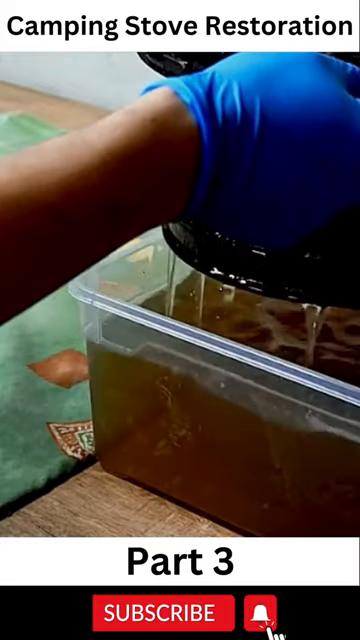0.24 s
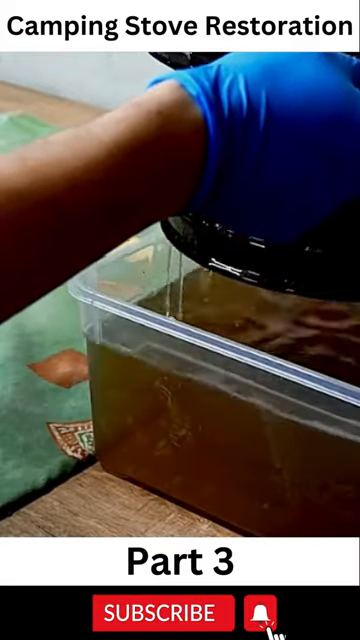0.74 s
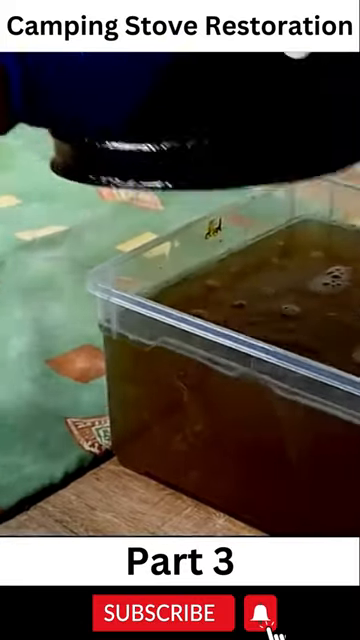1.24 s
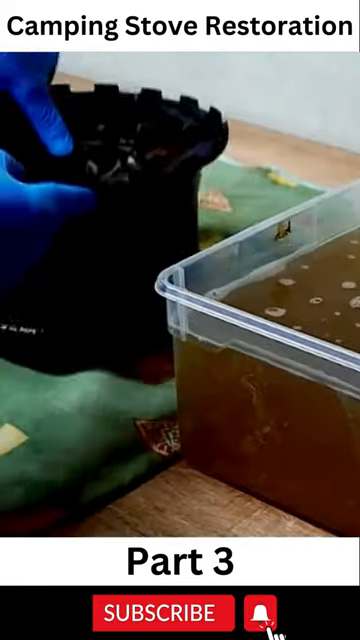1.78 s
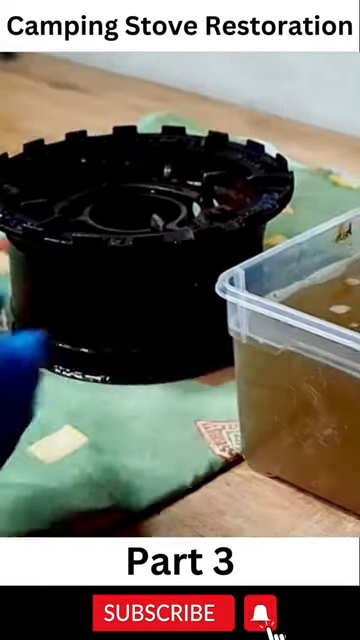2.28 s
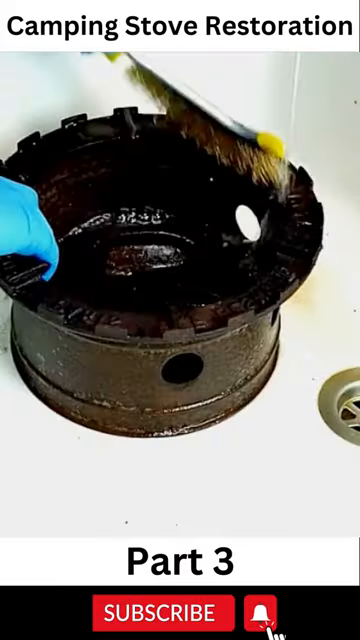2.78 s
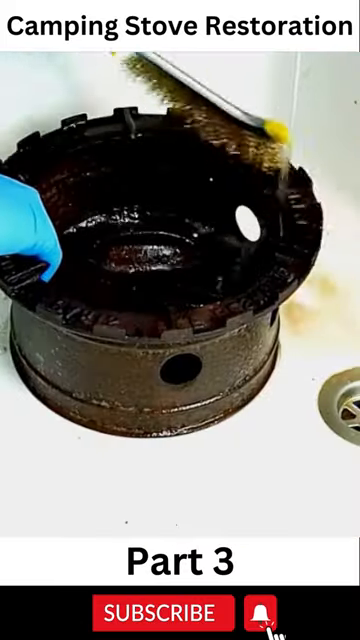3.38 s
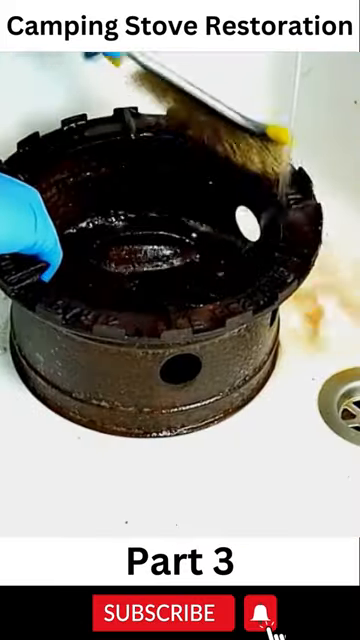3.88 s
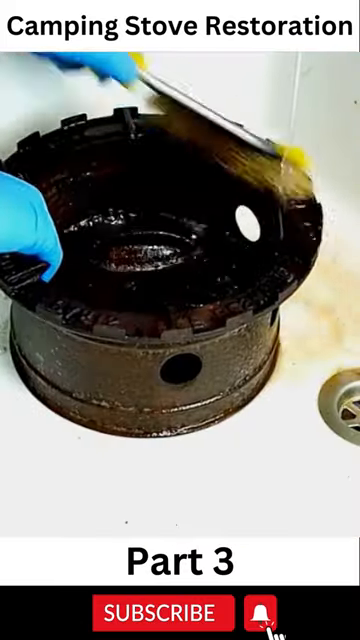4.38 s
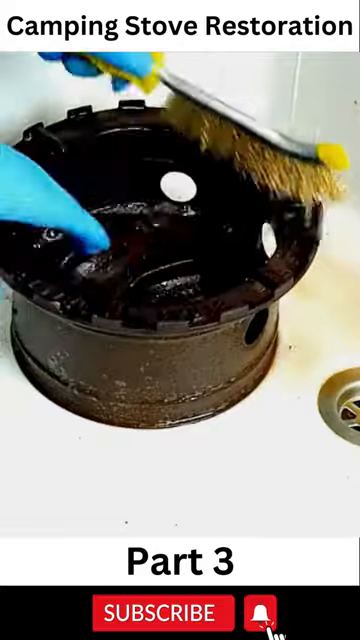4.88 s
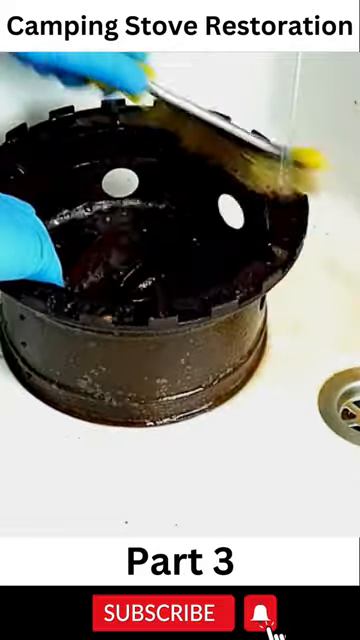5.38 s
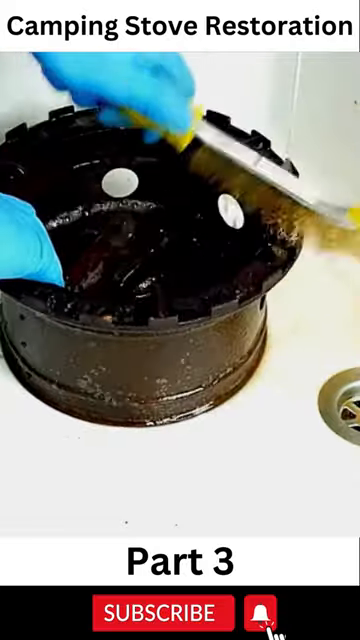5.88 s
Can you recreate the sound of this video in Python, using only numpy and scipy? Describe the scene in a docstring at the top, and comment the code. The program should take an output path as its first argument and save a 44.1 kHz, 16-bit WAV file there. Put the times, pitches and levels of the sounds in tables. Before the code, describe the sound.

From 0 to 0.9 s, water runs off a metal shell into a bath, close by: quick irregular plinks, ringing bubbles rising in pitch, and a fine spray, thinning out. The dripping cuts off; around 1.0 s a dull gloved double knock sounds on damped metal, with soft cloth rustle. Then the workshop is nearly silent, with faint knocks near 1.7 and 2.0 s over quiet room tone and low hum. At 2.69 s comes an abrupt cut to a sink: a small thud, a thin tap stream and stronger wavering hum. A wire brush rasps loudly over the toothed rim, seven bright, gritty strokes until 4.5 s, roughly every 0.27 s, ringing the metal. From 4.6 to 5.1 s brushing pauses for sharp ticks, rattles and low grinding as the shell is dragged round. Four more strokes follow from 5.14 s, with a heavier sink boom, until the end at about 6 s.

```python
"""A quiet workshop, then a sink, both heard close up through two microphone ports.
A cast metal stove shell lifted out of a bath drips as ringing bubbles over a fine spray; it is then handled
and set down on a cloth, with damped knocks and rustling grains. After a cut it stands in the sink under a
thin tap stream while a wire brush, dense clicks that ring shell and sink, scrubs its toothed rim.
The brush pauses while the shell is dragged round. Room tone and a wavering low hum lie behind."""
import sys
import numpy as np
from scipy import signal
from scipy.fft import rfft, irfft
from scipy.io import wavfile

SR = 44100
rng = np.random.default_rng(int(sys.argv[2]) if len(sys.argv) > 2 else 0)


def unload_wav(signal):
    """Save mono or channel-first audio to the path in sys.argv[1] as 16-bit WAV at rate SR, clipped to [-1, 1]."""
    wavfile.write(
        sys.argv[1],
        SR,
        np.round(np.clip(np.atleast_2d(signal).T, -1, 1) * 32767).astype(np.int16),
    )


def boost(x):
    """Linear amplitude factor 10**(x/20) for a level x in decibels (scalar or array-like)."""
    u = np.asarray(x, float) / 20
    return 10 ** u


N = 270774
TIME = np.arange(N) / SR
BATH_ENDS_S, SINK_STARTS_S, TURN_S = 0.908, 2.6865, 4.8


# Tone of the bristles on metal: freq_hz, level_db (relative)
BRISTLES = [(880, -71), (1500, 5.5), (1770, -6), (2170, -7.5), (2780, 2.5), (3060, -1), (5560, -0.5),
            (7670, -5), (8370, -3), (12900, -5.5), (15500, -8.5)]


def brushing():
    """Wires catch and let go in dense uneven clicks, in flurries as they cross the teeth of the rim."""
    wires = grains(9000.0, spread_db=3.0) * boost(1.2 * drift(60.0))
    scratch = patchy(colour(wires, BRISTLES), patchy_db=2.3, rate=18.0)
    ringing = shell(wires)
    bright_ring = rms_one(cut(ringing, 2700, "high"))
    middle = rms_one(cut(scratch, 7530, "low")) + boost(-18.0) * bright_ring
    hiss = rms_one(cut(scratch, 8300, "high"))
    ring = rms_one(cut(ringing, 2050, "low"))
    shaken = rms_one(boom(grains(2500.0, spread_db=2.5)))
    brushed = np.sum(strokes() * [middle, hiss, ring, shaken], axis=0)
    stream_ring = boost(-58) * ring  # the stream from the tap keeps the shell faintly ringing
    return brushed + dragging(scratch, ring, shaken) + stream_ring


# Brush strokes: lands_s, touch_db, rise_s, full_db, hold_s, shell_ring_db, sink_boom_db
# (touch and full are bristle levels; ring and boom are added to the stage colours below)
STROKES = [(2.73, -37.5, 0.083, -31, 0.055, -0.5, 3), (3.024, -37.5, 0.057, -25.5, 0.022, 2, 1.5),
           (3.293, -38.5, 0.052, -25.5, 0.033, 1, 1), (3.565, -34, 0.054, -24.5, 0.022, -2.5, -0.5),
           (3.82, -40.5, 0.057, -25.5, 0.026, -4, 1), (4.11, -30, 0.017, -26.5, 0.058, -3.5, 3.5),
           (4.373, -31, 0.055, -25, 0.01, -1.5, -0.5), (5.143, -28, 0.021, -25.5, 0.056, -2, 5),
           (5.426, -35, 0.034, -26, .012, 1, 2), (5.674, -30.5, 0.046, -26, 0.011, -3, 5.5),
           (5.935, -32.5, 0.042, -26.5, 0.034, -2.5, 6.5)]
# Colour of a stroke, one row each for approach, landing, full pressure, lift, trailing and end:
# hiss_db, shell_ring_db, sink_boom_db (all re bristles)
STAGES = [(9, -13, -23), (-4.5, -3, -13), (-3, -1.5, -21.5), (2, -1.5, -17), (-6.5, -3.5, -11),
          (1, -19, -5)]


def strokes():
    """Each stroke lands, swells to full pressure, holds, lifts and trails; the loudest at any moment is heard."""
    approach_s, approach_db = 0.015, -18  # the first wires touch this long before, this much weaker
    sag_db_per_s, lift_db_per_s = 47, 195.5  # loss while the brush holds, and as it lifts
    trail_db, trail_db_per_s, trail_s = -49, 87, 0.2  # below this level only trailing wires drag
    boom_lag_s = 0.018  # the heavy sink answers the brush late
    levels_db = np.full((4, N), -120.0)
    for lands_s, touch_db, rise_s, full_db, hold_s, ring_db, boom_db in STROKES:
        lift_db = full_db - sag_db_per_s * hold_s
        lift_s = (lift_db - trail_db) / lift_db_per_s
        steps_s = np.maximum([approach_s, rise_s, hold_s, lift_s, trail_s], 0.001)
        times_s = lands_s - approach_s + np.cumsum([0, *steps_s])
        end_db = trail_db - trail_db_per_s * trail_s
        bristle_db = np.array([touch_db + approach_db, touch_db, full_db, lift_db, trail_db, end_db])
        colours_db = np.add(STAGES, [0, ring_db, boom_db])
        layers_db = bristle_db[:, None] + np.c_[np.zeros(len(STAGES)), colours_db]
        curves_db = [np.interp(TIME, times_s, c, left=-120, right=-120) for c in layers_db.T]
        levels_db = np.maximum(levels_db, curves_db)
    levels_db[-1] = np.interp(TIME - boom_lag_s, TIME, levels_db[-1])
    return boost(levels_db)


# The shell dragged round on the sink: time_s, grind_db, gritty_hiss_db, grind_centre_hz
DRAG = [(4.6, -61, -66, 1122), (4.64, -61, -40, 1130), (4.762, -42, -71, 754), (4.8, -54, -42, 775),
        (4.862, -44.5, -47, 520), (4.885, -55.5, -66, 580), (5.0, -65.5, -49, 930),
        (5.062, -43.5, -42.5, 1050), (5.088, -43.5, -32.5, 1190), (5.124, -76, -55, 1160)]


def dragging(scratch, ring, shaken):
    """The shell grinds round on the sink: low rough contact shakes both, with gritty hiss on top."""
    grind_db, grit_db, grind_hz = in_time(DRAG)
    turning = (TIME > DRAG[0][0]) & (TIME < DRAG[-1][0])
    rough = grind(grind_hz) + boost(-1.5) * shaken + boost(-8.0) * ring
    return turning * (boost(grind_db) * rough + boost(grit_db) * rms_one(scratch))


def grind(centre_hz):
    """Rough metal on enamel: coarse clicks in a low region that moves with the contact."""
    clicks = grains(2000.0, spread_db=-6.0)
    out = np.zeros(N)
    for hz in np.geomspace(400, 1700, 8):
        band = rms_one(resonance(clicks, hz, hz / 31.0))
        out += boost(-24.0 * np.abs(np.log2(hz / centre_hz))) * band
    return out


# Ticks of wire and metal on the rim: start_s, peak_db (rattle alone), pitch_hz, t60_s (driving burst),
# width_share (of pitch)
TICKS = [(2.689, -36, 3150, 0.5, 0.96), (3.311, -36, 1320, 0.05, 0.67), (4.089, -29.5, 1300, 0.055, 0.97),
         (4.334, -23, 6240, 0.042, 0.87), (4.626, -12.5, 3030, 0.032, 0.71), (4.657, -26.5, 4350, 0.032, 1),
         (4.709, -13, 4020, 0.014, 0.49), (4.825, -28, 5500, 0.086, 0.15), (5.021, -24, 5760, 0.11, 1.4),
         (5.392, -26, 1410, 0.1, 0.77), (5.88, -29, 5500, .03, 0.25)]
# Short scrapes on the rim: start_s, peak_db (rattle alone), pitch_hz, t60_s (driving burst)
SCRAPES = [(2.686, -30.5, 1330, .12), (2.709, -29, 1650, 0.12), (2.947, -35, 1520, 0.032),
           (2.953, -33, 1240, 0.036), (2.956, -36.5, 1970, .07), (4.632, -19.5, 2840, 0.02),
           (4.754, -28.5, 838, 0.032), (5.043, -25, 5500, 0.019), (5.063, -30, 1470, 0.047),
           (5.076, -17.5, 6000, 0.056), (5.273, -26.5, 5550, 0.032), (5.351, -30, 2670, 0.046)]


def ticks():
    """Each tick is a crack and a short rattle about its own pitch; it also strikes the shell."""
    tick_rise_s, scrape_rise_s, scrape_width = 0.0012, 0.0092, 0.16
    # each landing ticks too: its peak follows the stroke's shell ring
    landings = [(lands_s, -30.5 + ring_db, 1300, 0.096, 0.52) for lands_s, *_, ring_db, _ in STROKES]
    rows = [(*row, tick_rise_s) for row in TICKS + landings]
    rows += [(*row, scrape_width, scrape_rise_s) for row in SCRAPES]
    out, blows, t = np.zeros(N), np.zeros(N), TIME[:SR // 6]
    for start_s, peak_db, hz, t60, width_share, rise_s in rows:
        noise = rng.standard_normal((2, len(t)))
        swell = np.minimum(t / max(rise_s, 0.0002), 1) * boost(-60 * t / max(t60, 0.005))
        width_hz = np.clip(width_share, 0.03, 1.5) * hz
        rattle = resonance(resonance(noise[0] * swell, hz, width_hz), hz, width_hz)
        crack = cut(noise[1] * swell, 2700, "high")
        crack_gain = boost(-4.5 - 2100 * rise_s)  # slow scrapes crack less
        tick = rattle / np.abs(rattle).max() + crack_gain * crack / np.abs(crack).max()
        add(out, start_s, boost(peak_db) * tick)
        add(blows, start_s, boost([peak_db - 1500 * rise_s]))  # and strike the shell less
    return out + boost(23.0) * shell(blows)


def thud():
    """The shell rocks down on the sink: one short push rings the sink's modes."""
    push = np.zeros(N)
    add(push, 2.6875, np.hanning(30))
    struck = boom(push, rocking=True)
    return boost(-21.5) * struck / np.abs(struck).max()  # peak dB


# Resonances of the shell on the sink: freq_hz, width_hz, before_turn_db, after_turn_db
SHELL = [(503, 20, -11, -7), (1000, 35, -17, -12), (1168, 13, -0.5, -6), (1192, 13, 0, -7),
         (1345, 17, -5, 1), (1725, 60, -13, -14), (2000, 50, -15, -15), (2698, 40, -6, -9),
         (2866, 30, -8, -9), (3385, 50, -9, -12), (4442, 40, -9, -12), (4700, 60, -10, -9),
         (5447, 55, -9, -9), (5907, 30, -9, -11), (6698, 30, -4, -7), (6858, 25, -5, -4),
         (7295, 30, -9, -9)]


def shell(x):
    """The turn puts brush and hand on other spots, so modes change strength; they also waver along a stroke."""
    out = np.zeros(N)
    for k, (hz, width_hz, before_db, after_db) in enumerate(SHELL):
        wavering = x * boost(2.73 * drift(23.0)) + 1e-18
        level = boost(np.where(TIME < TURN_S, before_db, after_db))
        out += (-1) ** k * level * resonance(wavering, hz, width_hz)
    return out


# Resonances of the sink under the shell: freq_hz, width_hz, shaken_db, struck_db
BOOM = [(205, 21, -2, 6.5), (283.2, 30, 0, -32), (374, 134, -6, -10), (451, 26, -11.5, -3),
        (487, 12.7, -8, 10), (611, 30, -4.5, 0), (780, 330, -14.5, -9)]


def boom(x, rocking=False):
    """The sink's modes, shaken by the brush or struck by the rocking shell."""
    out = np.zeros(N)
    for k, (hz, width_hz, shaken_db, struck_db) in enumerate(BOOM):
        level_db = struck_db if rocking else shaken_db
        out += (-1) ** k * boost(level_db) * resonance(x + 1e-18, hz, width_hz)
    return out


# Run-off into the bath: time_s, trickle_db, spray_db
RUNOFF = [(0.0, -41, -48.5), (0.074, -47.5, -52), (0.238, -54.5, -52.5), (0.5, -45, -52),
          (0.624, -48.5, -51), (0.778, -57, -55.5), (0.9, -58, -58)]
# Loudest drops: start_s, level_db (before the weighting by pitch), pitch_hz
DROPS = [(0.0156, -20.5, 3250), (0.1135, -22, 4720), (0.118, -22.5, 1186), (0.211, -35.5, 920),
         (0.231, -28, 1660), (0.233, -30.5, 1070), (0.264, -30, 1070), (0.276, -26, 1283),
         (0.2904, -26.5, 3290), (0.353, -32, 2300), (0.37, -30.5, 1144), (0.384, -31, 1190),
         (0.407, -26, 1262), (0.4364, -18, 3300), (0.455, -28.5, 1580), (0.4644, -26.5, 2370),
         (0.4786, -17.5, 4300), (0.509, -32, 1100), (0.552, -28, 1337), (0.594, -29.5, 1150),
         (0.6013, -23.5, 2206), (0.664, -29, 1234), (0.7128, -25, 3820), (0.7304, -23, 4080),
         (0.7512, -20, 3980), (0.838, -31, 1270)]
# Tone of the fine spray: freq_hz, level_db (relative)
SPRAY = [(350, -51), (600, -29), (979, -32), (1080, 9), (1230, 11), (2640, -5.5), (3660, -10.5),
         (6310, -14), (9370, -14), (15500, -21.5)]


def dripping():
    """Drops trap bubbles that ring and rise in pitch; many small ones come at random over a fine spray."""
    trickle_db, spray_db = in_time(RUNOFF)
    born = grains(450.0 * boost(3.0 * drift(15.0)), spread_db=4.0)
    dealt = rng.integers(0, 24, N)  # each small bubble gets one of 24 pitches
    small = np.zeros(N)
    for k, hz in enumerate(np.geomspace(950, 6000, 24)):
        small += resonance(born * (dealt == k) + 1e-18, hz, hz / 21.0) * (900 / hz) ** 0.89
    spray = rms_one(patchy(colour(grains(6000.0, spread_db=1.0), SPRAY), patchy_db=3.5, rate=18.0))
    low_spray = rms_one(cut(spray, 3000, "low"))
    out = boost(trickle_db) * (boost(-1.5) * rms_one(small) + boost(-7.0) * low_spray)
    out += boost(spray_db) * rms_one(cut(spray, 2450, "high"))

    t = TIME[:SR // 8]
    for start_s, level_db, hz in DROPS:
        t60 = 0.034 / (hz / 1e3) ** 0.44  # ring time, shorter for higher bubbles
        swell = (1 - np.exp(-t / 0.0026)) * boost(level_db - 60 * t / t60)
        bubble = np.sin(2 * np.pi * hz * t * (0.97 + 1.7 * t))
        noise = rng.standard_normal(len(t))
        splash = rms_one(resonance(resonance(noise, hz, hz / 5), hz, hz / 5))
        # high drops are more splash than bubble
        add(out, start_s, swell * (bubble * 1500 / hz + splash * hz / 9000))
    return out


# Shell handled and set down: start_s, peak_db (shell alone), strongest_hz, scuff_t60_s
KNOCKS = [(0.972, -36.5, 2600, 0.033), (1.024, -23.5, 1910, 0.042), (1.032, -24, 2610, 0.014),
          (1.393, -55, 2570, 0.046), (1.724, -46, 1870, 0.1), (1.734, -57, 1890, 0.044),
          (2.019, -52, 1200, 0.1), (2.043, -46.5, 1990, 0.032)]
# Resonances of the shell, damped by gloves: freq_hz, width_hz (limited in held_mode), level_db
HELD_SHELL = [(443, 230, -3), (1070, 98, 7), (1324, 100, 0), (1650, 200, 5), (1873, 190, 8.5),
              (2140, 300, -19), (2624, 240, 6.5), (2860, 220, 2.5), (3360, 230, -4), (3950, 320, -4.5),
              (4300, 170, -5), (5000, 110, -37)]


def knocks():
    """Padded contacts scuff the held shell and ring its damped modes, with a thin bright edge."""
    t, out = TIME[:SR // 3], np.zeros(N)
    for start_s, peak_db, centre_hz, t60 in KNOCKS:
        noise = rng.standard_normal(len(t))
        scuff = cut(noise * boost(-60 * t / max(t60, 0.005)), 6000, "low")  # padded contact is dull
        knock = np.zeros(len(t))
        for hz, width_hz, level_db in HELD_SHELL:
            away_db = 3.8 * abs(np.log2(hz / centre_hz))
            knock += boost(level_db - away_db) * held_mode(scuff, hz, width_hz)
        crack = 0.5 * cut(noise, 4500, "high") * boost(-25 - 60 * t / 0.025)
        add(out, start_s, boost(peak_db) * (knock / np.abs(knock).max() + crack))
    return out


# Shell sliding in the gloves and over the cloth: time_s, cloth_db, shell_ring_db (re cloth)
RUSTLE = [(0.918, -71, 2), (0.965, -54.5, -2), (0.98, -51, 1), (1.05, -50.5, 6), (1.119, -56.5, 11.5),
          (1.145, -57.5, -6), (1.38, -72.5, 2), (2.01, -72.5, -23), (2.08, -63, -17), (2.162, -68.5, -3),
          (2.68, -62.5, -10)]
# Tone of the cloth: freq_hz, level_db (relative)
CLOTH = [(180, -3), (300, -4.5), (590, 0), (1030, -0.5), (1640, -2.5), (1970, -3), (3450, -8.5),
         (15500, -35.5)]


def rustling():
    """Glove friction rings the held shell while the cloth rustles in fine grains."""
    cloth_db, ring_db = in_time(RUSTLE)
    friction = cut(grains(4000.0, spread_db=2.5), 4500, "low")
    rub = sum(boost(level_db) * held_mode(friction, hz, width_hz) for hz, width_hz, level_db in HELD_SHELL)
    cloth = rms_one(colour(grains(8000.0, spread_db=2.5), CLOTH)) * boost(1.5 * drift(12.0))
    return (TIME > BATH_ENDS_S) * boost(cloth_db) * (cloth + boost(ring_db) * rms_one(rub))


def held_mode(x, hz, width_hz):
    """A damped mode with steep skirts: two equal resonances in a row."""
    width_hz = np.clip(width_hz, 120, 300)
    return resonance(resonance(x, hz, width_hz), hz, width_hz)


# Tone of the thin tap stream: freq_hz, level_db (relative)
TAP = [(12, -36), (20, 6), (119, 15.5), (439, -8.5), (505, 5), (857, -8), (1160, 9), (1270, -4.5),
       (2150, 1.5), (2610, 3), (5530, -5), (11700, -4), (15500, -13.5)]


def tap():
    """A thin stream of water: dense random clicks of very uneven size, coloured."""
    return boost(-46.5) * rms_one(colour(grains(7000.0, spread_db=8.0), TAP))


# Tone of the quiet workshop: freq_hz, level_db (relative)
ROOM_TONE = [(12, -37), (20, -10.5), (92, -2.5), (191, -13), (298, -11), (427, -19), (667, -17), (746, -22),
             (881, -22), (2330, -27.5), (6540, -30), (12800, -33), (15500, -36)]


def room_tone():
    """Steady coloured noise of the quiet workshop."""
    return boost(-62) * rms_one(colour(rng.standard_normal(N), ROOM_TONE))


def hum(level_db):
    """A wavering low hum: noise through two narrow resonances in a row."""
    hz, width_hz = 115.6, 6.1
    noise = rng.standard_normal(N)
    return boost(level_db) * rms_one(resonance(resonance(noise, hz, width_hz), hz, width_hz))


def ports(x, width, wet_db, t60, near_t60):
    """A dying tail for both ports; near echoes reach them unequally."""
    mid = x + boost(wet_db) * diffuse(x, t60)
    side = colour(diffuse(mid, near_t60), width)
    return np.array([mid + side, mid - side])


def diffuse(x, t60):
    """Scattered echoes whose paths shift as hands and shell move: two patterns blend slowly."""
    t, turn = TIME[:SR // 2], 2.43 * drift(2.36)
    patterns = rng.standard_normal((2, len(t))) * boost(-60 * t / t60)
    one, other = (signal.fftconvolve(x, rms_one(echoes) / np.sqrt(len(t)))[:N] for echoes in patterns)
    return np.cos(turn) * one + np.sin(turn) * other


def patchy(x, patchy_db, rate):
    """Half-octave regions swell and fade on their own."""
    edges = 1000 * 2 ** np.arange(0, 4.6, 0.5)
    bins = np.arange(N // 2 + 1) * SR / N + 1
    place = np.clip(2 * np.log2(bins / edges[0]), 0, len(edges) - 1)
    spectrum, out = rfft(x), np.zeros(N)
    for k in range(len(edges)):
        region = irfft(spectrum * np.clip(1 - np.abs(place - k), 0, 1), N)
        out += region * boost(patchy_db * drift(rate))
    return out


def grains(per_s, spread_db):
    """Random clicks of uneven size and sign."""
    sizes = boost(spread_db * np.minimum(rng.exponential(1, N), 3.5)) * rng.choice([-1, 1], N)
    return sizes * (rng.random(N) < per_s / SR)


def drift(rate):
    """Slow random wander of rms 1; rate in Hz sets how fast."""
    r = np.exp(-2 * np.pi * rate / SR)
    noise = rng.standard_normal(N + SR)
    return rms_one(signal.lfilter([1], [1, -2 * r, r * r], noise)[SR:])


def resonance(x, hz, width_hz):
    """One ringing mode with gain 1 on top."""
    r = np.exp(-np.pi * width_hz / SR)
    poles = [1, -2 * r * np.cos(2 * np.pi * hz / SR), r * r]
    return signal.lfilter([(1 - r * r) / 2, 0, (r * r - 1) / 2], poles, x)


def colour(x, spectrum):
    """Shape by a (freq_hz, level_db) table, straight on a log axis."""
    hz, level_db = np.transpose(spectrum)
    bins = np.arange(N // 2 + 1) * SR / N + 1
    return irfft(rfft(x) * boost(np.interp(np.log(bins), np.log(hz), level_db)), N)


def cut(x, hz, kind):
    """Steep low- or high-pass."""
    sos = signal.butter(4, np.clip(hz, 20, 0.45 * SR), kind, fs=SR, output="sos")
    return signal.sosfilt(sos, x)


def rms_one(x):
    """Scale to rms 1."""
    return x / np.sqrt(np.mean(x ** 2) + 1e-20)


def in_time(rows):
    """Columns of a curve, sample by sample."""
    time_s, *columns = np.transpose(rows)
    return [np.interp(TIME, time_s, c) for c in columns]


def add(out, start_s, sound):
    """Mix a sound in at start_s."""
    i = round(start_s * SR)
    out[i:i + len(sound)] += sound[:N - i]


# Difference between the two ports: freq_hz, level_db (re their sum)
WORKSHOP_WIDTH = [(60, -35), (110, -22), (200, -9), (380, -7.5), (700, -6), (1290, -10.5), (2380, -7),
                  (4400, -5), (6500, -4), (8120, -15), (11500, -13), (15000, -15)]
SINK_WIDTH = [(60, -45), (110, -35), (200, -44), (380, -26), (700, -12.5), (1290, -18.5), (2380, -10),
              (4400, -7.5), (6500, -5.5), (8120, -17.5), (11500, -19), (15000, -10)]


def scene():
    """Bath and bench in the workshop, then the cut to the sink."""
    bath = ports(dripping(), WORKSHOP_WIDTH, wet_db=-1.0, t60=0.17, near_t60=0.064)
    bath = bath * (TIME < BATH_ENDS_S)
    at_bench = knocks() + rustling() + room_tone() + hum(-75)
    bench = ports(at_bench, WORKSHOP_WIDTH, wet_db=-6.5, t60=0.55, near_t60=0.28)
    at_sink = brushing() + ticks() + thud() + tap() + hum(-61.5)
    sink = ports(at_sink, SINK_WIDTH, wet_db=-6.0, t60=0.23, near_t60=0.27)
    return np.where(TIME < SINK_STARTS_S, bath + bench, sink)


def top_cut(x):
    """Nothing passes above the cut-off."""
    return signal.sosfilt(signal.butter(12, 16800, fs=SR, output="sos"), x)


def record(dry):
    """Peaks are rounded softly towards half scale and the top is cut steeply at 15.85 kHz."""
    peak_top = 0.5
    rounded = peak_top * np.tanh(dry / peak_top)
    mix = signal.sosfilt(signal.cheby2(16, 40, 15850, fs=SR, output="sos"), rounded)
    return top_cut(mix)


dry = scene()
out = record(dry)
unload_wav(out)
```